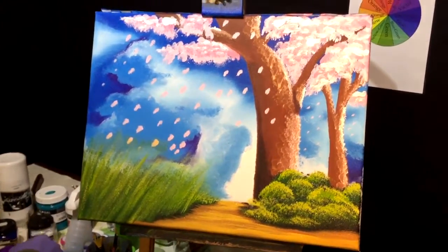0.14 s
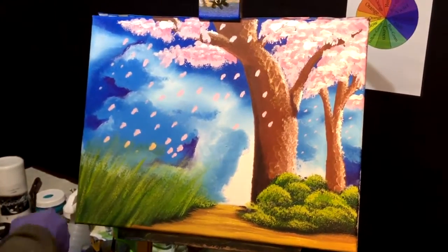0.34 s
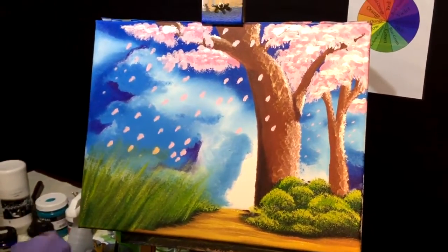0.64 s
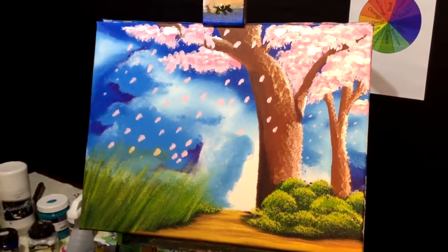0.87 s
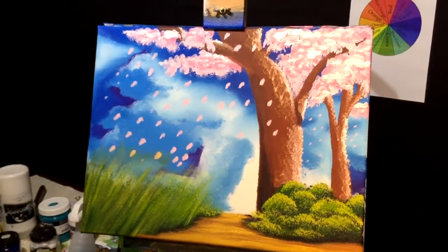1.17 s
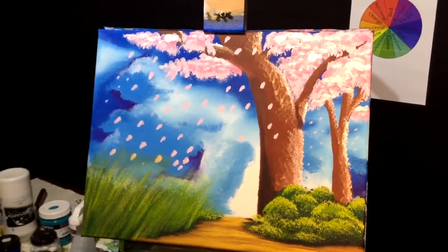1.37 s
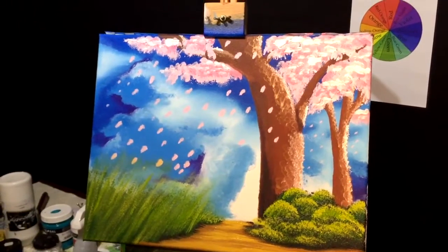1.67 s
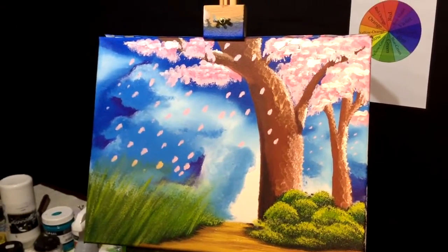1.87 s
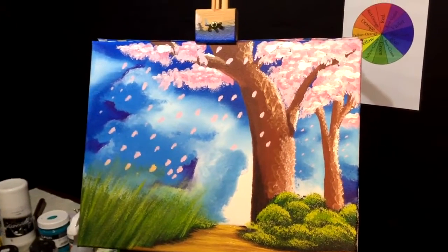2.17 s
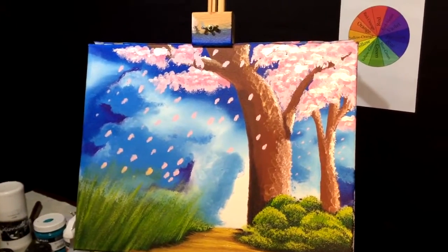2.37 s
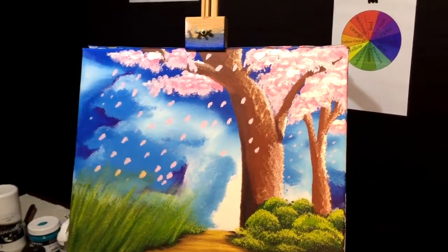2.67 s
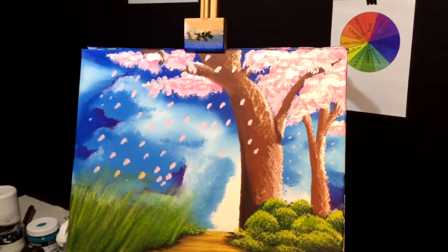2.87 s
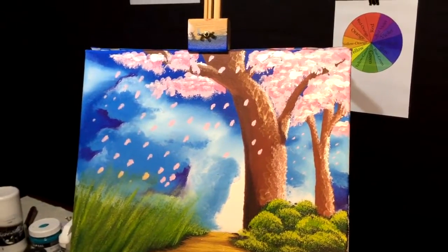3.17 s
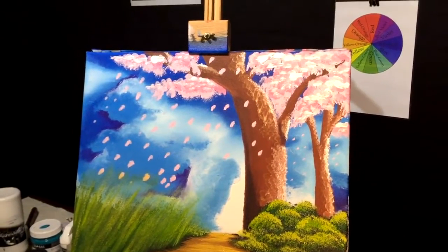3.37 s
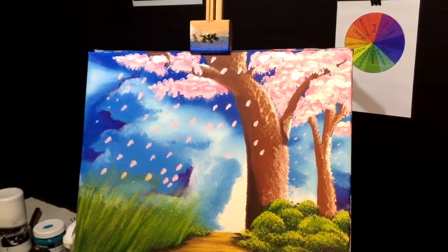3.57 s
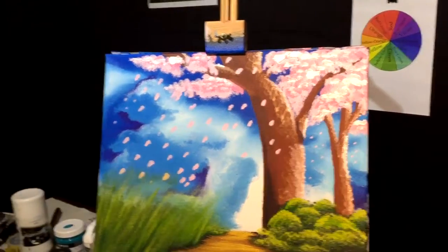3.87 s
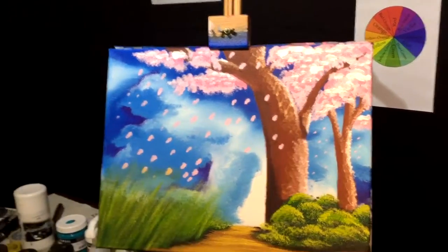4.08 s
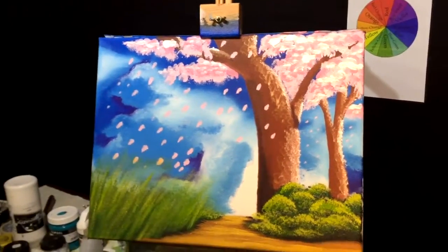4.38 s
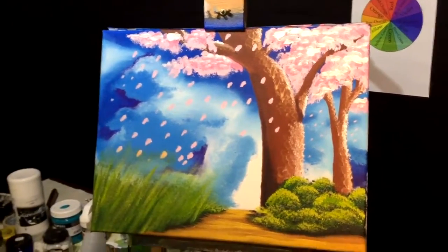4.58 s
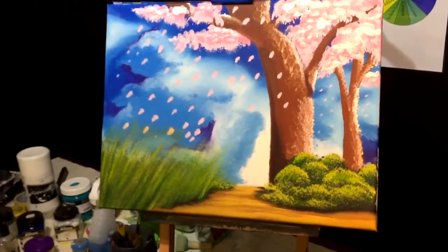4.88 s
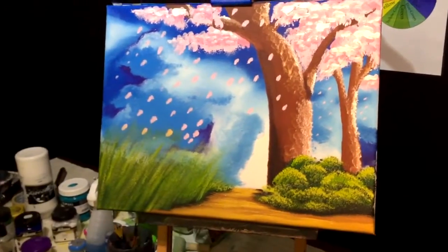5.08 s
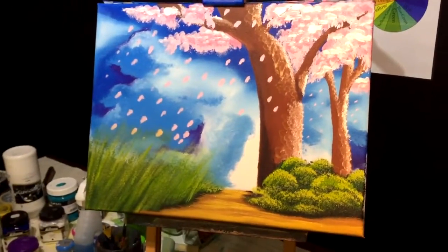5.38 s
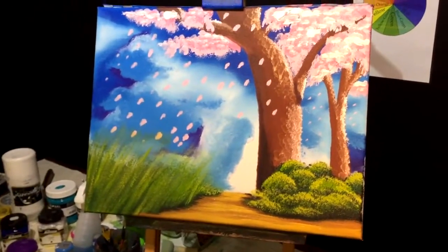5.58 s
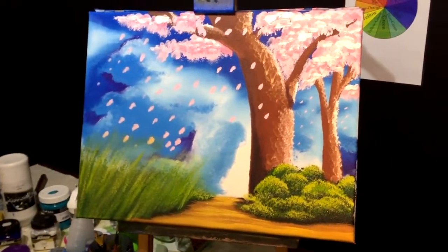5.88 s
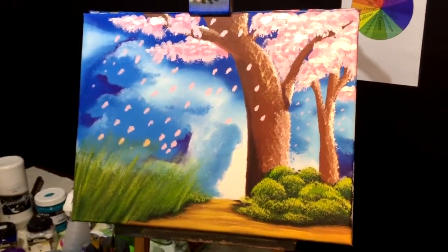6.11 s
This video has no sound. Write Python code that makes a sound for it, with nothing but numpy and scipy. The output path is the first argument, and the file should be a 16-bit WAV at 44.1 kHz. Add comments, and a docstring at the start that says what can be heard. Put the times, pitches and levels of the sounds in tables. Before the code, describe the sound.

A brush is rinsed in a jar indoors, heard by a nearby microphone with short room reverberation and faint steady room tone. Small clacks and a gurgling plunge come first, then a brighter tap, light watery swishes and drips, and two loud hollow jar knocks. Near quiet follows, then muffled bumps with a faint scuff, two dull thumps on stretched canvas, and a small low table thud.

```python
"""A brush is rinsed in a small room, over quiet room tone of shaped noise, then dabs a canvas.
First its handle clacks among pots (decaying modes), the table shuddering (low modes) as the brush plunges into a jar.
It swishes to and fro (bell-shaped bursts of fizz and noise) and sheds drips (gliding sines); bristles scuff (noise).
The filled jar knocks twice on the table (modes and damped clunks); later come soft low bumps (damped sines).
The brush dabs the stretched canvas, which answers like a soft drum (modes and a rough hum); last, the table is nudged."""
import sys
import numpy as np
from scipy import signal
from scipy.fft import rfft, irfft
from scipy.io import wavfile
from scipy.ndimage import uniform_filter1d

SR = 44100
rng = np.random.default_rng(int(sys.argv[2]) if len(sys.argv) > 2 else 0)


def inscribe(sig):
    """Save sig as 16-bit PCM at rate SR to the path in sys.argv[1].

    A 1-D sig is mono; a 2-D sig holds one channel per row.
    Samples are clipped to [-1, 1] before scaling.
    """
    pcm = np.round(np.clip(np.atleast_2d(sig).T, -1, 1) * 32767)
    wavfile.write(sys.argv[1], SR, pcm.astype(np.int16))


N = 275448
TIME = np.arange(N) / SR
AGE = np.arange(SR) / SR   # seconds since an event began


def from_db(db):
    """Logarithmic level: decibels become an amplitude gain."""
    return 10 ** (np.asarray(db) / 20)


def unit_energy(x):
    """Energy normalisation: the squares sum to one."""
    return x / np.sqrt(np.sum(x ** 2) + 1e-20)


def at_hz(points, hz):
    """Interpolation along log frequency between the points of a table."""
    point_hz, value = np.transpose(points)
    return np.interp(np.log(np.maximum(hz, 1)), np.log(point_hz), value)


def fade(t60):
    """Exponential free decay, 60 dB in t60 seconds."""
    return np.exp(-np.log(1000) * AGE / t60)


def dull(x, hz):
    """Low-pass filtering by two poles."""
    low_pass = signal.butter(2, min(hz, .45 * SR), fs=SR, output="sos")
    return signal.sosfilt(low_pass, x + 1e-18)


def add(out, s, sound):
    """Superposition: a sound is mixed in from time s."""
    start = max(round(s * SR), 0)
    out[start:start + len(sound)] += sound[:max(N - start, 0)]


def sine(hz):
    """Simple harmonic motion at a steady pitch."""
    return np.sin(2 * np.pi * hz * AGE)


def gliding_sine(pitch):
    """Frequency modulation: phase is the running sum of pitch."""
    return np.sin(2 * np.pi * np.cumsum(pitch) / SR)


def wobble(rate_hz, size):
    """Low-passed chance with a spread of 1."""
    settle = 4000   # samples for the filter to start up
    slow = dull(rng.standard_normal(size + settle), rate_hz)[settle:]
    return slow / np.std(slow)


def noise(spectrum, size, grain_db=0):
    """Spectral shaping of random noise to rms 1; uneven grain sizes make it crackle."""
    grain_sizes = from_db(grain_db * np.minimum(rng.exponential(1, size), 5))
    white = rng.standard_normal(size) * grain_sizes
    gain = from_db(at_hz(spectrum, np.arange(size // 2 + 1) * SR / size))
    return unit_energy(irfft(rfft(white) * gain, size)) * np.sqrt(size)


def burst(spectrum, t60):
    """High modal density: many overtones die at once, evened so that every blow has the same colour."""
    spread = rfft(rng.standard_normal(SR) * fade(t60))
    local_energy = uniform_filter1d(np.abs(spread) ** 2, size=160)
    even = spread / np.sqrt(local_energy + 1e-12)
    coloured = irfft(even * from_db(at_hz(spectrum, np.arange(len(even)))), SR)
    coloured = coloured * fade(min(10 * t60, .7))
    return unit_energy(coloured) * np.sqrt(np.sum(fade(t60) ** 2))


def struck(blows, modes, crack, crack_db, crack_t60, contact_s, scatter_db):
    """Modal excitation: each blow rings the modes in chance strengths with a crack; soft contact dulls both."""
    rings = np.array([(-1) ** k * from_db(db) * fade(t60) * sine(hz)
                      for k, (hz, db, t60) in enumerate(modes)])
    press = 1 - np.exp(-AGE / contact_s)   # the force takes a moment to build
    out = np.zeros(N)
    for s, db, contact_hz in blows:
        ringing = from_db(scatter_db * rng.standard_normal(len(modes))) @ rings
        overtones = from_db(crack_db) * burst(crack, crack_t60)
        add(out, s, from_db(db) * dull(press * (ringing + overtones), contact_hz))
    return out


def strokes(rows, grains, crisp_db):
    """Amplitude modulation: bell-shaped strokes release dulled grains, with a trace left crisp."""
    out = np.zeros(N)
    for s, width, db, bright_hz in rows:
        stroke = dull(grains, bright_hz) + from_db(crisp_db) * grains[::-1]
        bell = np.exp(-((TIME - s) / width) ** 2 / 2)
        out += from_db(db) * bell * stroke / np.std(stroke)
    return out


# First reflections off table, canvas and wall. Each row: delay in seconds, level in dB.
ECHOES = [(.0024, -23), (.0059, -11.5), (0.0094, -7)]


def near_surfaces(x):
    """Comb filtering: close reflections give a hollow colour."""
    out = x.copy()
    for delay, db in ECHOES:
        add(out, delay, from_db(db) * x)
    return out


# Bands in which the room answers most. Each row: frequency in Hz, level in dB.
ROOM_COLOUR = [(250, -0.5), (380, 3), (500, 0), (750, 3), (1000, 0), (1250, -1.5), (1600, -1.5),
               (1850, 0.5), (2060, 4.5), (2350, -3.5), (2900, 0.5), (4300, -1.5), (10000, -0.5),
               (15000, -7)]
# Reverberation time of the room. Each row: frequency in Hz, t60 in seconds.
ROOM_T60 = [(80, 0.76), (250, 0.6), (500, .5), (800, 0.44), (1100, 0.55), (1550, 0.36), (2100, 0.52),
            (2500, .45), (4000, .4), (8000, 0.28), (15000, 0.1294)]


def room(x, build_s):
    """Diffuse reverberation builds up, then dies band by band; the bass and two midrange bands linger."""
    hz, tail = np.arange(SR // 2 + 1), 0
    coloured = rfft(rng.standard_normal(SR)) * from_db(at_hz(ROOM_COLOUR, hz))
    build = 1 - np.exp(-(AGE / build_s) ** 2)
    edges = np.geomspace(30, 20000, 40)
    for low, high in zip(edges, edges[1:]):
        band = irfft(coloured * ((hz >= low) & (hz < high)), SR)
        decay = fade(at_hz(ROOM_T60, np.sqrt(low * high)))
        tail = tail + band * unit_energy(decay * build)
    return signal.fftconvolve(x, tail)[:N]


# Colour of the quiet room. Each row: frequency in Hz, relative level per hertz in dB.
ROOM_TONE = [(15, -43), (25, -18), (84, 1.5), (108, -1), (145, -3.5), (180, -5.5), (212, -7.5), (285, -7.5),
             (363, -10.5), (1160, -17.5), (1650, -15.5), (1840, -16), (5430, -22.5), (13600, -31.5),
             (16000, -35.5)]


def room_tone():
    """Stationary noise of a shaped spectrum, without events."""
    return from_db(-67.5) * noise(ROOM_TONE, size=N)


# Handle against the pots. Each row: start in seconds, relative level in dB, contact brightness in Hz,
# pitch ratio of the pot.
HANDLE_TAPS = [(.0055, -35, 1010, 0.82), (0.0142, -43, 3060, 0.85), (0.0746, -34.5, 4400, 0.82),
               (.081, -51, 1000, 0.89), (.096, -38.5, 1900, 0.83), (.113, -45, 2380, 1),
               (0.5945, -29, 11100, 1), (.6006, -27.5, 1250, .99), (0.6277, -42.5, 2200, 0.98),
               (0.6401, -41, 1960, 0.93)]
# Modes of handle and pot at ratio 1. Each row: frequency in Hz, relative level in dB, t60 in seconds.
HANDLE = [(417, -18, 0.27), (516, -16.5, 0.24), (604, -7, 0.063), (696, -9.5, 0.15), (792, -16, 0.12),
          (1221, -4, 0.095), (1252, -9, 0.37), (1298, -2.5, 0.14), (1528, -4, 0.055), (1904, -16, 0.22),
          (2040, -7, 0.038), (2200, -6, 0.026), (2470, -4, 0.051), (3060, -3, 0.028), (4100, -10, 0.07),
          (5760, -1.5, 0.022), (7380, -10, 0.054)]
# Colour of their dense overtones. Each row: frequency in Hz, relative level per hertz in dB.
HANDLE_CRACK = [(40, -43), (130, -4), (400, -9.5), (1000, -7.5), (2300, 3.5), (3500, -6.5), (6000, -19),
                (9500, -10.5), (11000, -23), (16000, -10.5)]


def handle_taps():
    """Modal scaling: the handle clacks against pots of different sizes, a larger pot ringing lower."""
    out = np.zeros(N)
    for s, db, contact_hz, ratio in HANDLE_TAPS:
        modes = [(hz * ratio, mode_db, t60) for hz, mode_db, t60 in HANDLE]
        out += struck([(s, db, contact_hz)], modes, HANDLE_CRACK,
                      crack_db=7.0, crack_t60=0.048, contact_s=0.00006, scatter_db=-0.5)
    return out * from_db(-2.0)


# Things nudge the table top. Each row: start in seconds, relative level in dB, contact brightness in Hz.
TABLE_THUDS = [(.195, -50, 437), (4.475, -43.5, 860), (4.503, -51, 597), (4.529, -52, 597),
               (6.226, -42, 299), (6.232, -37.5, 1100)]
TAP_THUD_DB, TAP_THUD_HZ = -10, 600   # what the table takes up of each tap; contact brightness


def table_blows():
    """Structural coupling: the table shudders under every tap on the pots, and when it is nudged."""
    taps = [(s, db + TAP_THUD_DB, TAP_THUD_HZ) for s, db, _, _ in HANDLE_TAPS]
    return taps + list(TABLE_THUDS)


# Modes of the table top. Each row: frequency in Hz, relative level in dB, t60 in seconds.
TABLE = [(71.4, -11, 0.13), (130.8, -2.5, 0.27), (177, -14, 0.104), (216.3, 4.5, 0.11), (245, -2, 0.12),
         (252, 4, 0.04), (339.7, -27, 0.12), (390, -8, 0.29)]
# Colour of its dense overtones. Each row: frequency in Hz, relative level per hertz in dB.
TABLE_CRACK = [(40, -28.5), (90, -8), (170, 4), (320, 1), (500, -7.5), (800, -3), (1500, -14.5),
               (4000, -14.5), (16000, -32)]


def table_shudders():
    """Plate vibration: low modes ring under a dull crack."""
    return from_db(-3.5) * struck(table_blows(), TABLE, TABLE_CRACK,
                                  crack_db=8.5, crack_t60=0.085, contact_s=0.0038, scatter_db=2.5)


# Air gulped under the brush. Each row: start in seconds, length in seconds,
# relative level of the loudest bubble in dB, middle pitch in Hz.
GULPS = [(0.026, 0.037, -55, 1170), (0.091, .035, -47, 1295), (0.138, .035, -41.5, 990),
         (0.183, .018, -40, 1290), (0.207, .04, -60, 1180), (1.208, 0.021, -59.5, 1450),
         (1.316, .03, -58.5, 1622), (1.447, 0.04, -61, 1000), (1.656, 0.031, -52, 1589),
         (2.332, .015, -64.5, 2209)]
GULP_OCTAVES, GULP_EDGE_DB, GULP_RISE = .9, -8.5, 2.91   # range each way; level at its ends; octaves per s


def gulped_bubbles(count):
    """Cavity break-up: each gulp frees bubbles of all sizes in quick, uneven succession."""
    rows = []
    for s, length, db, hz in GULPS:
        places = 2 * (np.arange(count) + rng.random(count)) / count - 1   # -1 largest, 1 smallest
        for place in places:
            rows.append((s + length * rng.random(), db + GULP_EDGE_DB * abs(place),
                         hz * 2 ** (GULP_OCTAVES * place), GULP_RISE))
    return rows


# Colour of spray. Each row: frequency in Hz, relative level in dB.
SPLASH = [(150, 12), (450, -8), (900, 6.5), (1600, 3), (2200, -2), (2900, 3.5), (4500, -1.5), (8000, -0.5),
          (12000, 6.5), (15000, 0.5)]


def fizz(per_s, cycles, size_db):
    """Random resonance: tiny bubbles burst by chance, each ringing some cycles at its own pitch; rms 1."""
    out = np.zeros(N)
    for hz in np.geomspace(600, 13000, 26):
        sizes = from_db(size_db * rng.standard_normal(N))
        births = (rng.random(N) < per_s / SR) * sizes * rng.choice([-1, 1], N)
        births = births + 1e-18 * rng.standard_normal(N)
        radius, turn = from_db(-60 * hz / (cycles * SR)), 2 * np.pi * hz / SR   # 60 dB in the given cycles
        rings = signal.lfilter([1, 0, -1], [1, -2 * radius * np.cos(turn), radius * radius], births)
        out += from_db(at_hz(SPLASH, hz)) * np.sqrt(hz) * unit_energy(rings)
    return out / np.std(out)


# The first plunge. Each row: height of the stroke in seconds, width in seconds, relative level in dB,
# brightness in Hz.
PLUNGES = [(.05, 0.063, -55.5, 3260), (.125, 0.014, -61.5, 3600), (0.193, 0.0074, -73, 1470)]
# Sweeps through the water. Each row: height in seconds, relative level in dB, brightness in Hz.
SWISHES = [(1.224, -66, 1880), (1.463, -56.5, 2240), (1.674, -58.5, 2870), (1.868, -57.5, 5000),
           (2.054, -58.5, 4060), (2.268, -74, 3050)]
# Bristles flick spray off the surface. Each row: height in seconds, relative level in dB.
FLICKS = [(1.484, -52), (1.659, -51.5), (1.872, -62), (2.287, -65)]
SWISH_WIDTH_S, FLICK_WIDTH_S, FLICK_HZ = 0.017, 0.0048, 9100
TICK_DB, TICK_WIDTH_S, TICK_HZ = -18, 0.00074, 2440   # the surface breaks, level against the bubble


def water_strokes():
    """Turbulent spray comes with the plunge, each sweep, each flick and the birth of each large bubble."""
    sweeps = [(s, SWISH_WIDTH_S, db, hz) for s, db, hz in SWISHES]
    flicks = [(s, FLICK_WIDTH_S, db, FLICK_HZ) for s, db in FLICKS]
    ticks = [(s + TICK_WIDTH_S, TICK_WIDTH_S, db + TICK_DB, TICK_HZ) for s, db, _, _ in BUBBLES]
    return list(PLUNGES) + sweeps + flicks + ticks


# The larger air pockets and drips. Each row: start in seconds, relative level in dB, pitch in Hz,
# rise in octaves per second.
BUBBLES = [(.141, -41, 677, -2.5), (.144, -44, 963, 7.5), (.155, -37, 1020, 2), (.146, -41, 2020, 1.5),
           (0.159, -48, 3860, -2), (.24, -47.5, 1202, 1.5), (.188, -33, 974, -1), (0.1848, -38.5, 1214, 1),
           (0.187, -42, 1620, -1.5), (.201, -49, 2020, 0.5), (.31, -48.5, 2040, 1),
           (0.309, -52.5, 1105, 9.5), (1.306, -46, 1120, 18), (1.313, -54.5, 2900, 4.5),
           (1.395, -42.5, 1576, -1), (1.483, -56.5, 722, 12), (1.512, -59.5, 2180, -3),
           (1.532, -61, 995, 15), (1.577, -38.5, 2003, -1.5), (1.579, -46.5, 5630, -21),
           (1.627, -48.5, 1450, 2), (1.668, -43, 1517, 1.5), (1.699, -45.5, 5280, -1),
           (1.784, -59.5, 1300, 20.5), (1.845, -50, 3900, -16), (2.037, -53.5, 2770, -10),
           (2.286, -55, 1750, 1), (2.334, -50.5, 2133, 2), (5.492, -55.5, 1196, 11)]
BUBBLE_T60_S, BUBBLE_SWELL_S, SIZE_LAW = 0.12, 0.004, 0.97   # at 1 kHz; both shorten by this power of pitch


def bubbles(unrest_db, waver, size):
    """Volume resonance: trapped air rings, a small pocket more briefly, its pitch gliding as the water moves."""
    out, age = np.zeros(N), AGE[:size]
    for s, db, hz, rise in list(BUBBLES) + shed_bubbles(count=4) + gulped_bubbles(count=10):
        bulk = (1000 / hz) ** SIZE_LAW
        swell, t60 = BUBBLE_SWELL_S * bulk, BUBBLE_T60_S * bulk
        glide = rise * np.minimum(age, t60 / 3)   # octaves
        pitch = hz * 2 ** (glide + waver * wobble(150, size=size))
        shaken = from_db(db + unrest_db * wobble(170, size=size))
        level = shaken * (1 - np.exp(-age / swell)) * fade(t60)[:size]
        add(out, s, level * gliding_sine(pitch))
    return out


SHED_DB, SHED_HZ, SHED_OCTAVES = -19, 2000, 0.18   # level against the sweep, middle pitch, spread
SHED_WITHIN_S, SHED_RISE = 0.16, 4.2   # rise in octaves per s


def shed_bubbles(count):
    """Air entrainment: each sweep leaves small bubbles in its wake, louder after a harder stroke."""
    rows = []
    for s, db, _ in SWISHES:
        for _ in range(count):
            pitch_hz = SHED_HZ * 2 ** (SHED_OCTAVES * rng.standard_normal())
            rows.append((s + SHED_WITHIN_S * rng.random(), db + SHED_DB, pitch_hz, SHED_RISE))
    return rows


def rinsing_water():
    """Resonance and turbulence together: ringing bubbles beside strokes of spray."""
    spray = fizz(per_s=90, cycles=40, size_db=2.5) + from_db(-2.5) * noise(SPLASH, size=N)
    splashes = near_surfaces(strokes(water_strokes(), spray, crisp_db=-48.0))
    return bubbles(unrest_db=4.0, waver=0.035, size=11000) + from_db(-1.0) * splashes


# Bristles scuff rim and rag. Each row: height of the stroke in seconds, width in seconds,
# relative level in dB, brightness in Hz.
SCUFFS = [(.690, 0.0039, -35.5, 5960), (4.478, 0.0061, -47.5, 1670), (4.51, 0.031, -53.5, 2380),
          (5.42, 0.015, -60, 9900), (5.465, 0.011, -61.5, 2680)]
SCRATCH_S, SCRATCH_WIDTH_S, SCRATCH_HZ = 0.02, 0.0035, 6100   # the bristles splay just after landing
PEEL_S, PEEL_WIDTH_S, PEEL_DB, PEEL_HZ = 0.078, 0.0068, -18.5, 1720   # and peel off, against the dab


def bristle_strokes():
    """Sliding friction in scuffs, and as the bristles splay and peel in every dab."""
    splay = [(s + SCRATCH_S, SCRATCH_WIDTH_S, db, SCRATCH_HZ) for s, _, _, db in DABS]
    peel = [(s + PEEL_S, PEEL_WIDTH_S, db + PEEL_DB, PEEL_HZ) for s, db, _, _ in DABS]
    return list(SCUFFS) + splay + peel


# Colour of rubbing bristles. Each row: frequency in Hz, relative level per hertz in dB.
BRISTLES = [(200, 6.5), (800, -3.5), (1400, 6), (2300, 7), (2900, 2.5), (3600, 6.5), (4900, 1), (6700, 4.5),
            (10000, -4), (15000, 1)]


def rubbing_bristles():
    """Stick-slip friction: bristles catch and let go in tufts, so the noise is uneven."""
    catching = from_db(2.3 * wobble(210, size=N))
    grains = catching * noise(BRISTLES, size=N, grain_db=-0.5)
    return from_db(-5) * near_surfaces(strokes(bristle_strokes(), grains, crisp_db=-61.0))


# The jar comes down edge first, rocks flat and chatters. Each row: start in seconds, relative level in dB,
# contact brightness in Hz, pitch of the clunk at this spot in Hz, clunk level against the ring in dB.
JAR_CONTACTS = [(2.5141, -21.5, 2300, 1708, 3), (2.5198, -16.5, 898, 868, 14), (2.5335, -25, 899, 846, 10),
                (2.5396, -25.5, 908, 883, 7), (2.5584, -29.5, 893, 898, 6.5), (2.583, -33, 854, 843, 6.5),
                (2.661, -13.5, 8820, 1322, 1), (2.6664, -19, 1192, 794, 13.5), (2.6742, -25, 2600, 1150, 6),
                (2.683, -28, 1487, 702, 9), (2.7165, -31.5, 1820, 1000, 1), (2.733, -30.5, 1400, 1060, 3)]
# Modes of the jar. Each row: frequency in Hz, relative level in dB, t60 in seconds.
JAR = [(383.8, -21, 0.2), (660, -4, .06), (705.8, -1, 0.091), (786, -6.5, 0.07), (826.4, -8, 0.15),
       (863, -12.5, 0.1116), (938, -19.5, 0.25), (1035, -9, 0.06), (1100, -5, .06), (1169, -11, 0.11),
       (1251, -5.5, 0.09), (1324, -5, 0.036), (1406, -7.5, .1), (1520, -16.5, .13), (1794, -17, 0.16),
       (1920, -11, 0.094), (1970, -13, 0.094), (2052, -18, .12), (2130, -20.5, .14), (2291, -22, 0.13),
       (2711, -12.5, 0.069), (2884, -13.5, 0.1), (3490, -11.5, .06), (3870, -15, 0.1), (4240, -9, 0.051),
       (4480, -14, 0.036), (5768, -17, 0.073), (7040, -33, 0.052)]
# Colour of its dense, quickly dying overtones. Each row: frequency in Hz, relative level per hertz in dB.
JAR_CRACK = [(100, -18.5), (300, -14.5), (520, -27), (700, 1), (1380, 1), (1680, -7), (2000, 1),
             (2280, -9.5), (2800, -6.5), (3100, -10), (3600, -12), (4300, -10.5), (5000, -16.5),
             (7000, -13), (10500, -29), (12000, -19.5), (16000, -24)]


def jar_knocks():
    """Impact of a shell: each contact rings the jar and gives a short, damped clunk at the spot struck."""
    blows = [(s, db, contact_hz) for s, db, contact_hz, _, _ in JAR_CONTACTS]
    out = struck(blows, JAR, JAR_CRACK, crack_db=9.0, crack_t60=0.03, contact_s=.0006, scatter_db=1.5)
    clunk = (1 - np.exp(-AGE / 0.00077)) * fade(0.017)   # rise and t60 in seconds
    for s, db, _, hz, clunk_db in JAR_CONTACTS:
        add(out, s, from_db(db + clunk_db) * clunk * sine(hz))
    return out * from_db(-5)


# The jar's weight settles. Each row: start in seconds, relative level in dB, contact brightness in Hz.
JAR_THUDS = [(2.5198, -36, 500), (2.5625, -34, 600), (2.6665, -36.5, 450), (2.7215, -36.5, 550),
             (2.745, -38, 350)]
# Modes of the filled jar on the boards. Each row: frequency in Hz, relative level in dB, t60 in seconds.
JAR_BOUNCE = [(71.4, -10, 0.3), (128.5, -8, 0.3), (193, -12.5, .1), (273, -10, 0.15), (389.7, 2, 0.2)]


def jar_thuds():
    """Mass on a spring: the filled jar bounces on the boards, with the table's crack."""
    return struck(JAR_THUDS, JAR_BOUNCE, TABLE_CRACK,
                  crack_db=6, crack_t60=0.08, contact_s=0.002035, scatter_db=-0.5)


# Soft low bumps. Each row: start in seconds, relative level in dB, pitch in Hz.
BUMPS = [(4.215, -47.5, 195), (4.215, -54, 556), (4.359, -50, 556), (4.379, -46.5, 165), (4.405, -42, 343),
         (4.412, -43.5, 102), (4.431, -50, 735), (4.6528, -35.5, 467)]


def soft_bumps():
    """Heavily damped oscillation: a few cycles each, heard close and without the room."""
    out = np.zeros(N)
    for s, db, hz in BUMPS:
        add(out, s, from_db(db) * fade(9.9 / hz) * sine(hz))   # 9.9 cycles to die by 60 dB
    return dull(out, 1000)


# Bristles dab the canvas. Each row: start in seconds, relative level in dB, contact brightness in Hz,
# relative level of the bristle scratch in dB.
DABS = [(4.9043, -37.5, 510, -89), (5.2396, -36, 560, -48.5)]
LIFT_S, LIFT_DB, LIFT_HZ = 0.066, -7.5, 1100   # the cloth springs back, against the dab


def canvas_blows():
    """Membrane excitation: the cloth is struck as the brush lands and again as it lifts."""
    landings = [(s, db, hz) for s, db, hz, _ in DABS]
    lifts = [(s + LIFT_S, db + LIFT_DB, LIFT_HZ) for s, db, _, _ in DABS]
    return landings + lifts


CANVAS_HZ, DRAG_S, HUM_LEAD_S = 220.7, 0.073, 0.0029   # hum pitch, time until release, lead on the dab


def canvas_hum(swell_s, release_t60, rough):
    """Friction-driven oscillation: the dragging brush feeds a rough hum, which dies when it stops."""
    out = np.zeros(N)
    release = from_db(-60 * np.maximum(AGE - DRAG_S, 0) / release_t60)
    level = (1 - np.exp(-AGE / swell_s)) * release
    for s, db, _, _ in DABS:
        pitch = CANVAS_HZ * (1 + rough * wobble(74, size=SR))
        add(out, s - HUM_LEAD_S, from_db(db) * level * gliding_sine(pitch))
    return out


# Drum modes of the cloth. Each row: frequency in Hz, relative level in dB, t60 in seconds.
CANVAS = [(71.6, -15, 0.37), (114.4, -17, 0.66), (136, -19, 0.61), (181, -9, 0.086), (194, -1, 0.17),
          (234, -22, 0.15), (291, -8.5, 0.36), (343, -37, 0.31), (422.4, -7, 0.34), (455, -12.5, 0.34),
          (597, -5.5, 0.049), (661, -12, 0.17), (744, -13, 0.085)]
# Colour of its dense overtones. Each row: frequency in Hz, relative level per hertz in dB.
CANVAS_CRACK = [(40, -16), (90, -17), (200, 19), (450, 4), (800, -2), (1300, -14), (4000, -31),
                (16000, -33)]


def canvas_dabs():
    """Membrane vibration: the struck cloth rings like a soft drum beside its hum."""
    drum = struck(canvas_blows(), CANVAS, CANVAS_CRACK,
                  crack_db=0.0, crack_t60=0.35, contact_s=0.0013, scatter_db=-1.8)
    return drum * from_db(-1.0) + canvas_hum(swell_s=0.0029, release_t60=0.034, rough=0.075)


def scene():
    """Superposition of direct and reverberant sound, each source with its own share, over the room tone."""
    handle = handle_taps()
    table = table_shudders() + jar_thuds()
    water = rinsing_water()
    bristles = rubbing_bristles()
    jar = jar_knocks()
    canvas = canvas_dabs()
    to_room = from_db(-10.5) * handle + from_db(-6) * table + from_db(-14) * water
    to_room = to_room + from_db(-10.5) * bristles + from_db(-9.5) * jar + from_db(-4.5) * canvas
    direct = handle + table + water + bristles + jar + soft_bumps() + canvas
    # a steep high-pass at 55 Hz, like a microphone's, removes the deep bass
    bass_cut = signal.butter(4, 55, "high", fs=SR, output="sos")
    sound = signal.sosfilt(bass_cut, direct + room(to_room, build_s=0.0041))
    return (sound + room_tone())[None]


def record(dry):
    """Band limiting: a steep low-pass removes the top above 15.8 kHz."""
    return signal.sosfilt(signal.ellip(10, .2, 80, 15800, fs=SR, output="sos"), dry)


dry = scene()
out = record(dry)
inscribe(out)
```